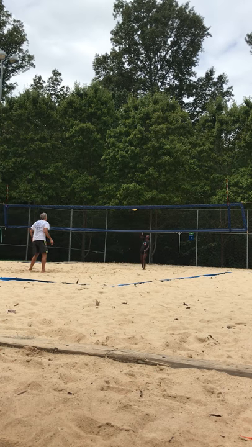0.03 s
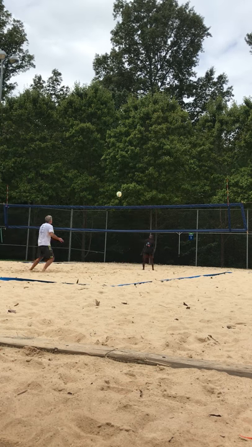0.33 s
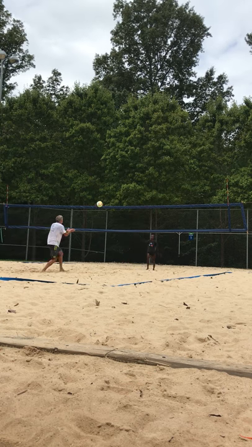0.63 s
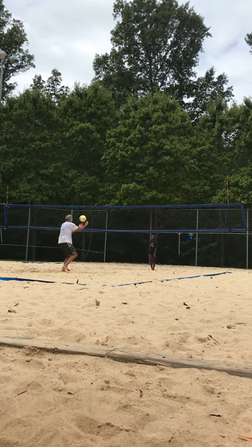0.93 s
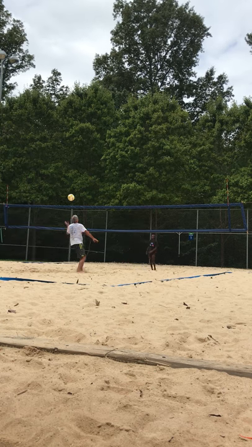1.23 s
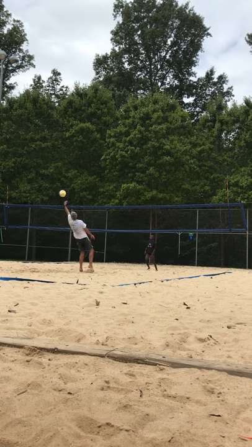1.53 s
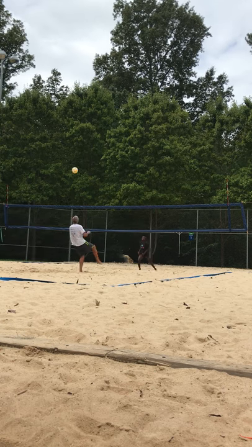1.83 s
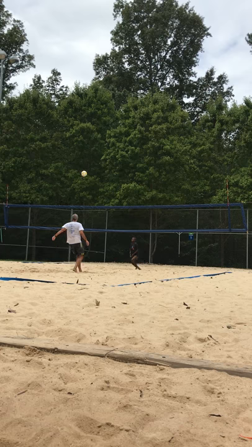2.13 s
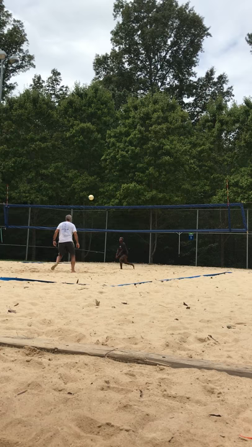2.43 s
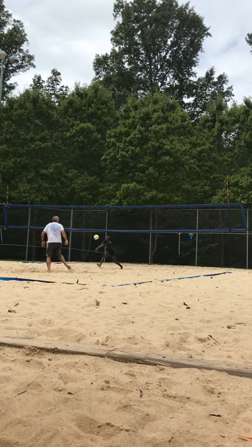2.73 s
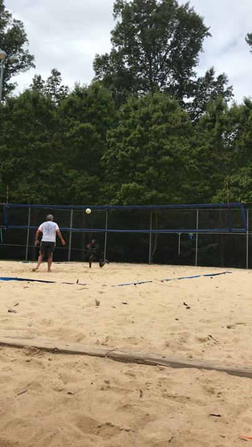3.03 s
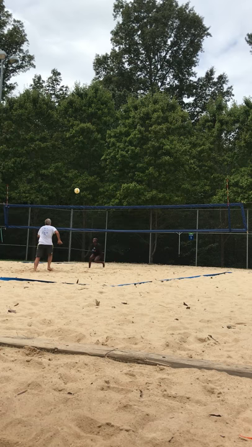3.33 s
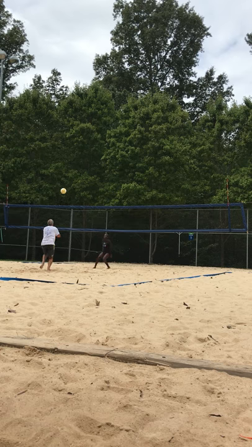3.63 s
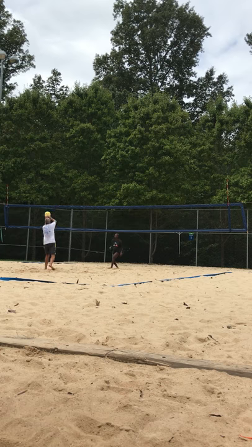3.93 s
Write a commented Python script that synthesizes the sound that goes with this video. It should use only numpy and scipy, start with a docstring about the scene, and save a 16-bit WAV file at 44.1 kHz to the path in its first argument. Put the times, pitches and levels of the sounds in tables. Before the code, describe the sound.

Four hand and forearm hits smack a volleyball outdoors, over a faint distant rumble.

```python
"""A beach volleyball rally on a sand court ringed by tall trees: four contacts with hands and forearms.
Each is a skin slap, a low thump of the squeezed ball and a faint ping of the air inside it.
The trees scatter the slaps back to the microphone and a far surface returns one dull echo.
Behind the play are a distant rumble, rustling leaves, thin insect buzzes and far trills."""
import sys
import numpy as np
from scipy import signal
from scipy.fft import rfft, irfft, next_fast_len
from scipy.io import wavfile
from scipy.ndimage import uniform_filter1d, map_coordinates

SR = 44100
rng = np.random.default_rng(int(sys.argv[2]) if len(sys.argv) > 2 else 0)


def wav_record(signal):
    """Record a signal, one row per channel, as 16-bit PCM in the file named by sys.argv[1]."""
    frames = np.transpose(np.atleast_2d(signal))
    bounded = np.clip(frames, -1, 1)
    # unit amplitude maps onto the largest positive 16-bit level
    quanta = np.round(bounded * 32767).astype(np.int16)
    wavfile.write(sys.argv[1], SR, quanta)


N = 176400
TIME_S = np.arange(N) / SR


def amp(db):
    return 10 ** (np.asarray(db) / 20)


def unit_rms(x):
    return x / np.sqrt(np.mean(x ** 2) + 1e-20)


def along(points, hz):
    """Read (hz, value) points on a log frequency axis."""
    knots_hz, values = np.transpose(points)
    return np.interp(np.log(hz + 1), np.log(knots_hz + 1), values)


def filtered(x, response):
    """Apply a gain that depends on frequency."""
    size = next_fast_len(len(x) + SR // 2)
    return irfft(rfft(x, size) * response(np.fft.rfftfreq(size, 1 / SR)), size)[:len(x)]


def band(x, low_hz, high_hz, order):
    sos = signal.butter(order, [low_hz, high_hz], 'band', fs=SR, output='sos')
    return signal.sosfilt(sos, x + 1e-12)


def minimum_phase(gain):
    """The causal response with this gain."""
    cepstrum = irfft(np.log(gain + 1e-12))
    half = len(cepstrum) // 2
    cepstrum[1:half] *= 2
    cepstrum[half + 1:] = 0
    return np.exp(rfft(cepstrum))


def noise(spectrum):
    """Coloured noise of rms 1."""
    return unit_rms(filtered(rng.standard_normal(N), lambda hz: amp(along(spectrum, hz))))


def wobble(rate_hz):
    """A smooth random curve with rate_hz knots a second."""
    count = int(N * rate_hz / SR) + 4
    curve = map_coordinates(rng.standard_normal(count), [np.arange(4 * count - 3) / 4])
    return np.interp(TIME_S * rate_hz, np.linspace(0, count - 1, len(curve)), curve)


def fuzzy_tone(pitch_hz, width_hz):
    """A narrow band of noise around a moving pitch."""
    flutter = wobble(2 * width_hz) + 1j * wobble(2 * width_hz)
    return unit_rms(np.real(flutter * np.exp(2j * np.pi * np.cumsum(pitch_hz) / SR)))


def swell(middle_s, length_s):
    return np.cos(np.pi * np.clip((TIME_S - middle_s) / length_s, -.5, .5))


def add(track, start_s, x):
    part = track[max(round(start_s * SR), 0):][:len(x)]
    part += x[:len(part)]


def burst(x):
    """Scale to the energy of a 0 dB slap: 2 ms at rms 1."""
    return x * np.sqrt(.002 * SR / np.sum(x ** 2))


# Colour of the rumble beyond the trees: frequency_hz, gain_db
RUMBLE_SPECTRUM = [(15, -55), (25, -32), (39, -14.5), (52, -2), (70, 1), (110, -4.5), (161, -9),
                   (238, -14.5), (331, -21), (600, -37.5), (1000, -68)]
def rumble():
    """A low, nearly steady rumble from far off."""
    return amp(-48.5 + .38 * wobble(5.83)) * noise(RUMBLE_SPECTRUM)


# Colour of the foliage: frequency_hz, gain_db
LEAF_SPECTRUM = [(260, -8.5), (450, -5), (700, 1), (1350, 0), (2300, -7), (3620, -7.5), (4800, -11),
                 (6000, -12), (8330, -15.5), (9700, -18.5), (10500, -24), (11500, -19), (15800, -23.5)]
# Slow rise and fall of the rustle: time_s, gain_db
LEAF_GAINS = [(0, 2), (.8, 0.5), (1.398, 1.5), (2.2, 1.5), (2.8, 2), (3.4, 1.5), (4, 2)]
def leaves():
    """Leaves rustle lightly around the court."""
    swell_db = np.interp(TIME_S, *np.transpose(LEAF_GAINS))
    return amp(-64.5 + swell_db + .1 * wobble(5.36)) * noise(LEAF_SPECTRUM)


# Calls in the distance: middle_s, length_s, level_db, pitch_hz
FAR_TRILLS = [(0.447, 0.7, -76, 3560), (2.5, 0.43, -75, 3720), (2.778, 0.46, -77, 3360)]
def trills(fall_hz_per_s=500):
    """Thin, far trills swell and fade as their pitch falls."""
    out = np.zeros(N)
    for middle_s, length_s, level_db, pitch_hz in FAR_TRILLS:
        glide_hz = pitch_hz - fall_hz_per_s * (TIME_S - middle_s)
        out += amp(level_db) * swell(middle_s, length_s) * fuzzy_tone(glide_hz, width_hz=150)
    return out


# Ticks and buzzes, faint at the microphone: middle_s, length_s, level_db
INSECT_CALLS = [(1.36, .025, -79), (1.42, .025, -76), (1.5, .025, -75), (1.97, .6, -76), (2.46, 0.6, -75),
                (3.58, .025, -76), (3.644, .025, -74), (3.745, .025, -75), (3.84, .025, -74)]
def insects(pitch_hz=15000, pulse_hz=55):
    """Insects sound a very high, pulsing buzz in short and long spells."""
    tone = fuzzy_tone(pitch_hz + 120 * wobble(60), width_hz=550)
    pulse = 1 + .7 * np.sin(2 * np.pi * pulse_hz * TIME_S + wobble(15))
    spells = sum(amp(db) * swell(middle_s, length_s) for middle_s, length_s, db in INSECT_CALLS)
    return spells * unit_rms(tone * pulse)


# Colour of the echo off the tree line: frequency_hz, gain_db
TREE_SPECTRUM = [(100, 2), (450, -6.5), (800, -9), (1400, -2), (2500, 0.5), (4500, -0.5), (6200, 1.5),
                 (8000, -2.5), (11500, -4.5), (15500, -6)]
# Decay of its early part: frequency_hz, t60_s
TREE_DECAY = [(200, 0.43), (2000, 0.39), (6000, 0.21), (14000, 0.12)]
def tree_echo(rise_s=.029, deep_db=-6, deep_stretch=3.14):
    """Leaves and trunks scatter a slap into a swelling, uneven hiss; deeper woods ring longer."""
    hz, t, hiss = signal.stft(rng.standard_normal(SR), SR, nperseg=256)
    fall_db = -60 * t / along(TREE_DECAY, hz)[:, None]
    envelope = (amp(fall_db) + amp(deep_db + fall_db / deep_stretch)) * np.minimum(t / rise_s, 1)
    colour = amp(along(TREE_SPECTRUM, hz))[:, None]
    tail = signal.istft(hiss * envelope * colour, SR, nperseg=256)[1]
    return burst(tail * amp(1.2 * wobble(256)[:len(tail)]))


# Light after-slaps on court: middle_s, level_db, decay_s, edge_hz
ARM_BRUSHES = [(.025, -38.5, 0.00054, 3800), (1.0186, -42.5, .005, 4000), (1.652, -57, .002, 4500),
               (2.9595, -47, .002, 6960)]
def brushes(t):
    """The ball brushes the arms as it leaves them."""
    out = np.zeros(N)
    for middle_s, level_db, decay_s, edge_hz in ARM_BRUSHES:
        lead_s = 4 * decay_s
        rub = np.exp(-np.abs(t - lead_s) / decay_s) * rng.standard_normal(len(t))
        body = band(rub, 840, edge_hz, order=3)
        sheen = amp(-14) * band(rub, edge_hz, 15000, order=1)
        add(out, middle_s - lead_s, amp(level_db) * burst(body + sheen))
    return out


# Air modes inside the ball: pitch_hz, gain_db, t60_s
AIR_MODES = [(1245, 4, 0.17), (1587, -16, 0.24), (1890, -16, 0.18), (2050, 13, 0.044), (2690, 32, 0.02),
             (3290, 1, 0.095), (3870, -8, 0.18), (4270, -33, 0.15)]
def ping(t):
    """The enclosed air rings briefly, a little differently at each contact."""
    return sum(amp(gain_db + rng.normal(0, 1.2) - 60 * t / t60_s) * np.sin(2 * np.pi * pitch_hz * t)
               for pitch_hz, gain_db, t60_s in AIR_MODES)


FULL_CONTACT_S = .0008  # time from first touch to full smack
def thump(t, pitch_hz, sag_s, swell_s, release_s, floor_hz=66.7):
    """The ball squashes and rebounds in a few swings, its pitch sagging as it flattens."""
    hz = floor_hz + (pitch_hz - floor_hz) * np.exp(-t / sag_s)
    rise = np.sin(np.pi / 2 * np.minimum(t / swell_s, 1))
    fall = np.abs(np.cos(np.pi / 2 * np.clip((t - swell_s) / release_s, 0, 1))) ** 2.1
    return rise * fall * np.sin(2 * np.pi * np.cumsum(hz * (t > FULL_CONTACT_S)) / SR)


# Bands that colour a slap: low_hz, high_hz
SKIN_BANDS = [(270, 470), (540, 1210), (1130, 1433), (1480, 1740), (2350, 3560), (3300, 3900), (5550, 6280),
              (6600, 21000)]
def slap(t, decay_s, bands_db, touch_db=-14.5, shudder_db=-21.5, shudder_s=.0085):
    """Skin meets the cover: a light first touch, the full smack, then the cover shudders."""
    after_s = np.maximum(t - FULL_CONTACT_S, 0)
    smack = np.exp(-(after_s / decay_s) ** 2)
    shudder = amp(shudder_db) * np.exp(-after_s / shudder_s)
    crack = np.where(t < FULL_CONTACT_S, amp(touch_db), smack + shudder) * rng.standard_normal(len(t))
    crack[[0, round(FULL_CONTACT_S * SR)]] += 6 * np.array([amp(touch_db), 1])  # a click at each onset
    low_hz, high_hz = np.transpose(SKIN_BANDS)
    density_db = np.array(bands_db) - 10 * np.log10(np.abs(high_hz - low_hz) + 1)
    centres = zip(np.sqrt(low_hz * high_hz), density_db)
    outline = [(60, density_db[0] - 24), *centres, (high_hz[-1], density_db[-1] + 6.5)]
    spectrum = rfft(crack)
    ripple = np.sqrt(np.abs(uniform_filter1d(np.abs(spectrum) ** 2, size=50)))
    colour = amp(along(outline, np.fft.rfftfreq(len(t), 1 / SR))) / ripple  # evens out chance peaks
    return np.linalg.norm(amp(bands_db)) * burst(irfft(spectrum * minimum_phase(colour)))


# Contacts on court: start_s, thump_db, pitch_hz, sag_s, swell_s, release_s, slap_decay_s,
# bands_db (one for each of SKIN_BANDS), ping_gain_db, echo_db, echo_delay_s
CONTACTS = [(.0098, -20, 295, 0.0066, 0.0029, .023, 0.0013, -32.5, -31.5, -37, -23.5, -22, -25.5, -37, -28.5, -59, -29, .033),
            (0.9941, -26.5, 225, 0.032, 0.0061, 0.0061, 0.0058, -41, -44, -32, -44, -40.5, -39, -47.5, -39, -57.5, -51.5, 0.035),
            (1.632, -35.5, 230, 0.018, 0.0083, 0.0042, 0.0024, -45, -42.5, -42.5, -49, -48, -46.5, -55, -51, -72, -66, 0.039),
            (2.9488, -21, 209, .012, 0.0091, 0.011, 0.00082, -49, -44.5, -34.5, -37.5, -42.5, -34.5, -27.5, -28.5, -67, -46, 0.043)]
def rally(far_delay_s=.099, far_db=-15.5):
    """Hands and forearms strike the ball; the trees answer first, then a far surface, dully."""
    out, t = np.zeros(N), np.arange(SR // 10) / SR
    for contact in CONTACTS:
        start_s, thump_db, pitch_hz, sag_s, swell_s, release_s = contact[:6]
        slap_decay_s, *bands_db, ping_gain_db, echo_db, echo_delay_s = contact[6:]
        hit = slap(t, slap_decay_s, bands_db)
        hit += amp(thump_db) * thump(t, pitch_hz, sag_s, swell_s, release_s)
        hit += amp(ping_gain_db) * ping(t)
        add(out, start_s, hit)
        add(out, start_s + echo_delay_s, amp(echo_db) * tree_echo())
        add(out, start_s + far_delay_s, amp(far_db) * band(hit, 77, 500, order=2))
    return out + brushes(t)


def scene():
    """The rally in front, its surroundings well behind, in mono."""
    return (rally() + rumble() + leaves() + insects() + trills())[None]


def record(dry):
    """One microphone, rolling off steeply at the top of its range."""
    top_hz, slope_hz = 16000, 160
    return np.array([filtered(x, lambda hz: .5 - .5 * np.tanh((hz - top_hz) / slope_hz)) for x in dry])


dry = scene()
out = record(dry)
wav_record(out)
```